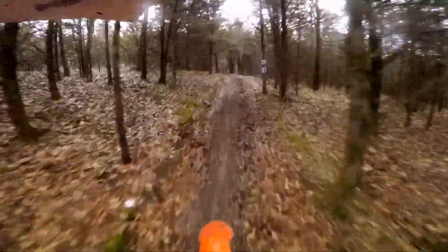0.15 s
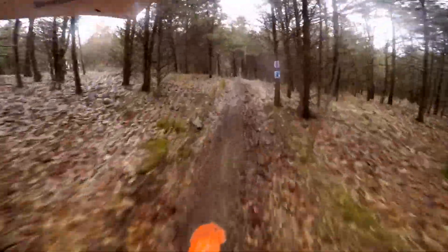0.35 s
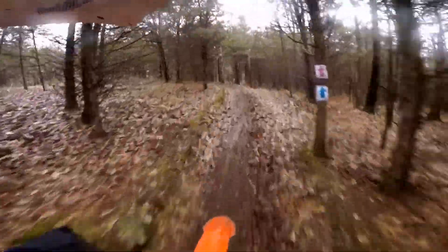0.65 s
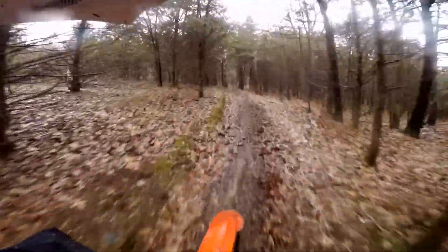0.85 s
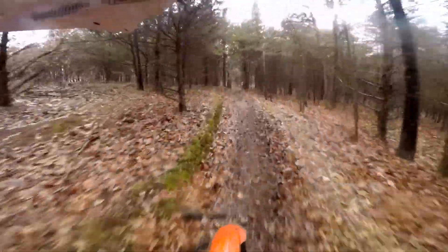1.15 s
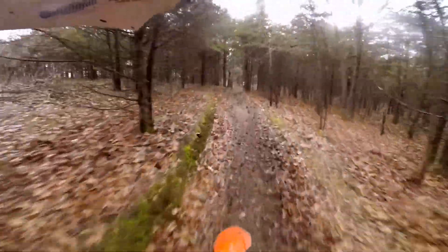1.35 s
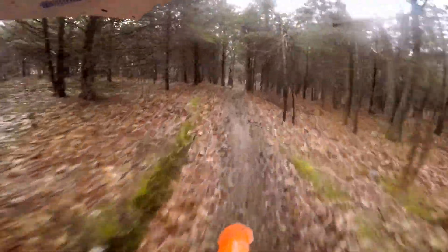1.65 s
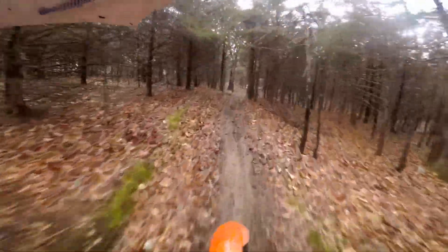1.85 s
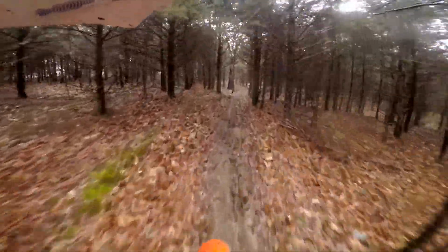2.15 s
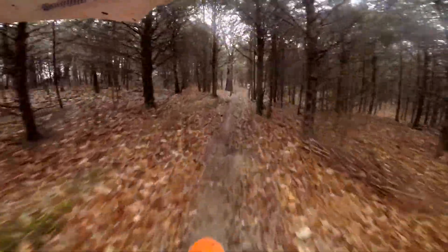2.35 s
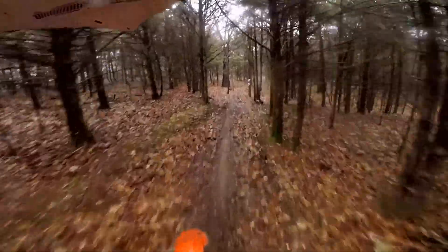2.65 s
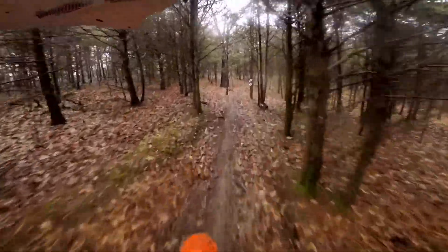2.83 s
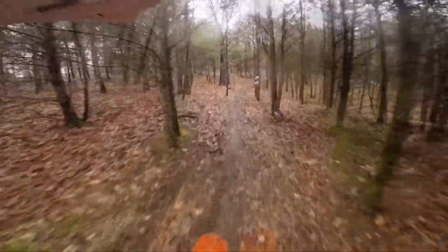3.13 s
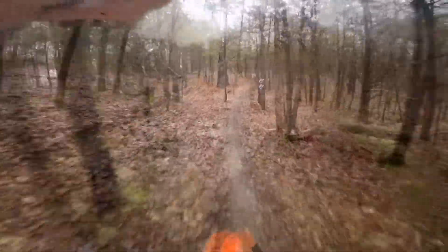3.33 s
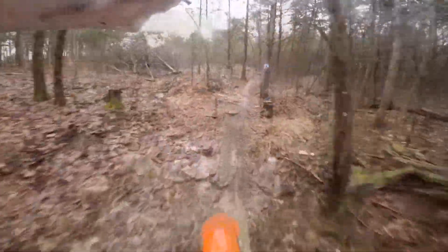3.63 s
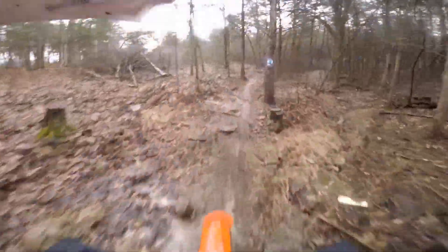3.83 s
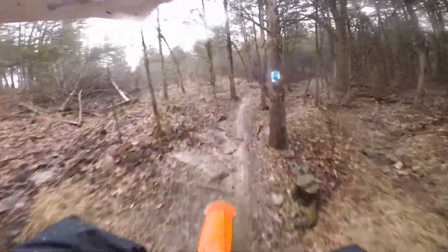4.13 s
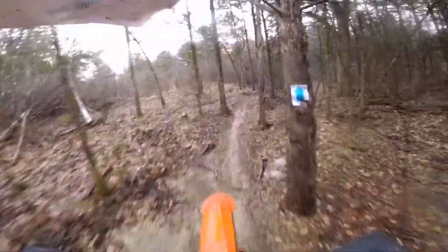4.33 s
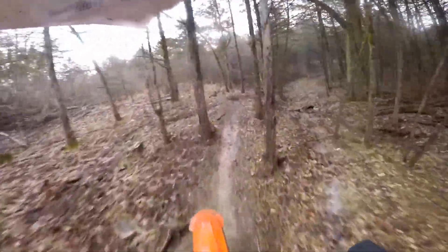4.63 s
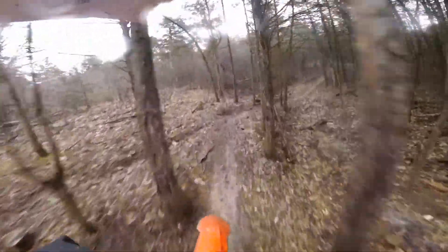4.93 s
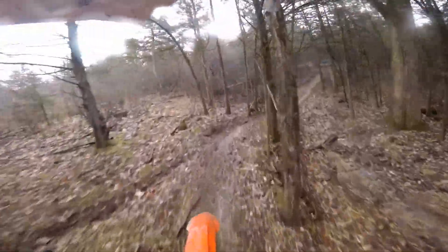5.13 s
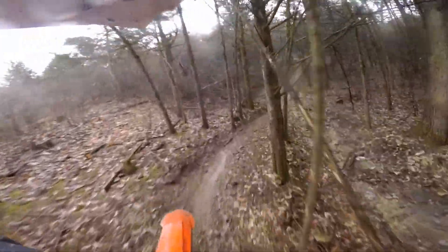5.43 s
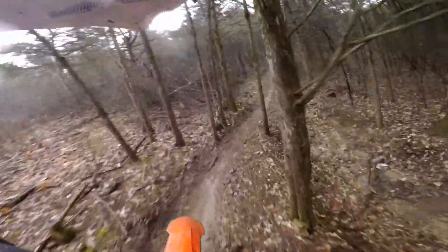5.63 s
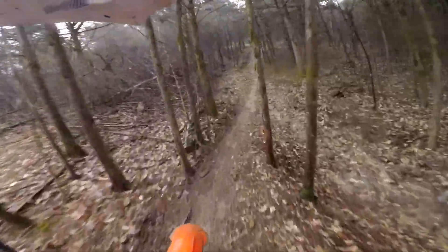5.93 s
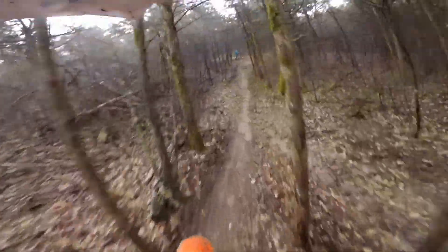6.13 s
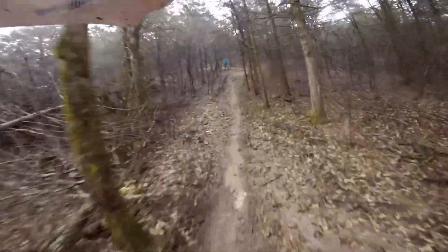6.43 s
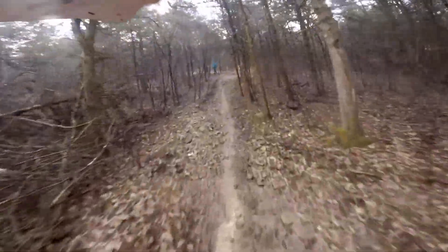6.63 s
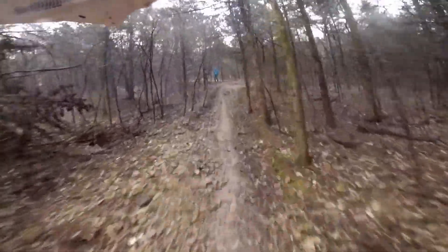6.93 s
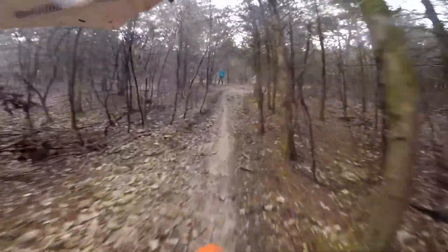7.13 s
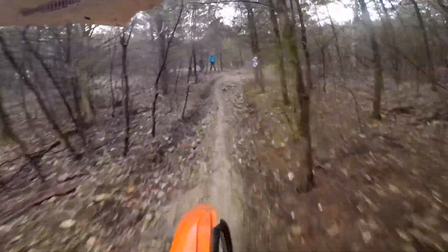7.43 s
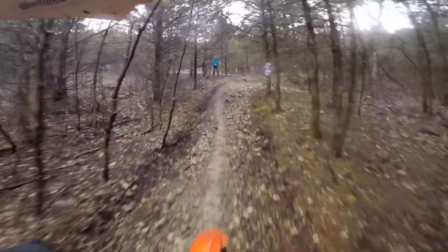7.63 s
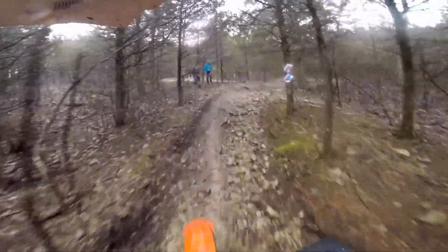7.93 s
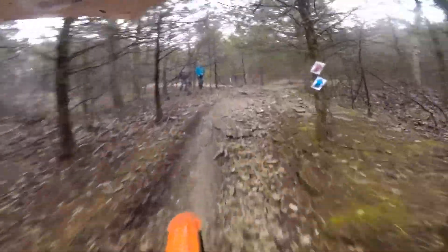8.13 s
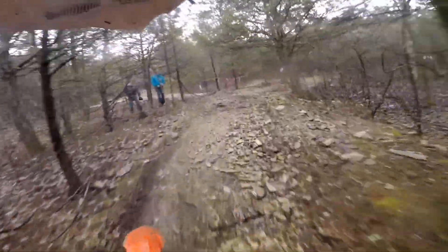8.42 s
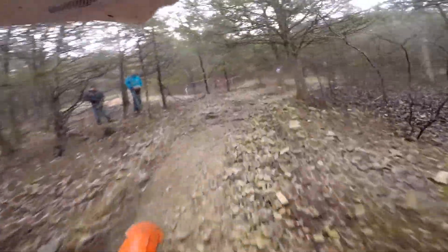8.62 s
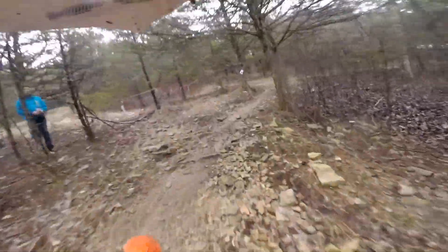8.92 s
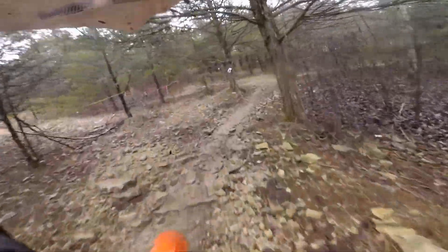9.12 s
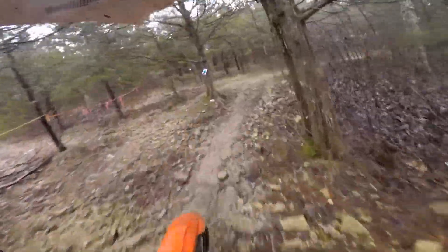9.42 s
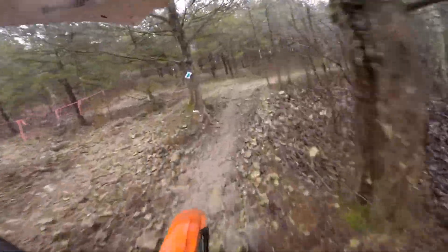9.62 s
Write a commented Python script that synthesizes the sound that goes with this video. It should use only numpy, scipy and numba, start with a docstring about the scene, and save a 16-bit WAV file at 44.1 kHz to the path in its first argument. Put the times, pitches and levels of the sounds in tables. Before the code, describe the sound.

A four-stroke single-cylinder dirt bike is ridden hard through woods, heard close and muffled from a closed housing on the helmet. It begins in full bark, shuts off near 0.6 s, then pulls again from 1.0 to 1.7 s, swelling in level. Short bursts follow around 2.0, 2.6, 3.1 and 3.9 s, each dropping to a ragged burble with occasional pops; a small click falls at 3.9 s. Revs sag in brief blips at 4.5 and 4.8 s, and between 5.2 and 5.8 s jolts thud and rattle over the coasting engine. A long pull from 5.9 to 6.9 s climbs to a high, urgent note. More bursts come at 7.3 and 8.2 s, then lower, lumpy stabs after 8.8 s with knocks from the ground. A bright scrape swishes by at 9.5 s. Chain clatter, wavering gear whine, hiss and gusty low wind continue throughout.

```python
"""On a forest trail, a four-stroke single-cylinder dirt bike is ridden hard, heard from inside a closed
housing on the rider's helmet. Puffs of exhaust ring the pipe whenever the throttle opens; an uneven burble
of noise is left when it shuts. Gears whine as a narrow band of noise, chain and stones clatter as dense
grains ringing the frame, bumps are short noise bursts, and filtered noise makes the wind and a passing scrape."""
import sys
import numpy as np
from scipy import signal
from scipy.io import wavfile
from scipy.ndimage import uniform_filter1d, minimum_filter1d
from numba import njit

SR = 44100
rng = np.random.default_rng(int(sys.argv[2]) if len(sys.argv) > 2 else 0)


def master(y):
    """Save y as 16-bit WAV."""
    cut = np.clip(np.atleast_2d(y).T, -1, 1)
    pcm = np.round(cut * 32767)  # scale
    wavfile.write(sys.argv[1], SR, pcm.astype(np.int16))


N = 430857  # length in samples


def undb(db):
    """Turn decibels into a plain multiplier."""
    return np.exp(np.asarray(db) * (np.log(10) / 20))


def level(x, db):
    """Scale a sound so that its average (RMS) level is db."""
    return x * undb(db) / np.sqrt(np.mean(x ** 2))


def curves(table):
    """Join each column of a table by straight lines over time, one value per sample."""
    times, *columns = np.transpose(table)
    return [np.interp(np.arange(N) / SR, times, column) for column in columns]


def walk(rate):
    """Wander between random normal values, rate of them a second, along straight lines."""
    count = int(N / SR * rate) + 2
    return np.interp(np.arange(N) * (rate / SR), np.arange(count), rng.standard_normal(count))


def ring(x, modes, order=1):
    """Add up resonances (f/Hz, width/Hz, level/dB); order 2 falls off more steeply on both sides."""
    out = 0
    for hz, width, db in modes:
        edges = [hz - width / 2, hz + width / 2]
        band = signal.butter(order, edges, "bandpass", fs=SR, output="sos")
        out = out + undb(db) * signal.sosfilt(band, x)
    return out


@njit
def svf(x, hz, width):
    """Resonance whose centre and width may move, gain 1 at the centre; for tones far below the sample rate."""
    y, band, low = np.empty(len(x)), 0., 0.
    for i in range(len(x)):
        g, k = np.pi * hz[i] / SR, width[i] / hz[i]
        v = (band + g * (x[i] - low)) / (1 + g * (g + k))
        band, low, y[i] = 2 * v - band, low + 2 * g * v, k * v
    return y


def swell(x, hz, width, count):
    """A resonance run forwards and backwards, so it swells into each puff and dies away as evenly after it."""
    for _ in range(2 * count):
        x, hz, width = svf(x, hz, width)[::-1].copy(), hz[::-1].copy(), width[::-1].copy()
    return x


def steady(value):
    """The same value for every sample."""
    return np.full(N, 1. * value)


# level of the three upper pipe modes against the boom, as load and revs change:
# t/s, level/dB, level/dB, level/dB
BARK_LEVELS = [(0.0, -18, -6, -19), (0.08, -8, -14, -19), (0.26, -5.0, -14.5, -24), (0.4, -4.5, -11, -23),
               (0.56, -13.5, -7.5, -17.5), (1.0, -6, -9, -9), (1.2, -20, -16.5, -25),
               (1.36, -21, -17, -25.5), (1.46, -21, -19, -32), (1.6, -19, -29, -29.5),
               (1.78, -24, -21, -17.5), (1.96, -9, -13, -12), (2.04, -19, -11.5, -26),
               (2.16, -25, -16, -27), (2.32, -17, -18, -32), (2.6, -9.5, -9.5, -12.5),
               (2.74, -17, -21, -15.5), (2.82, -9, -12, -24), (2.9, -12, -13.5, -16),
               (2.98, -13, -5.5, -13.0), (3.16, -20, -12, -13.5), (3.28, -13, -16, -29),
               (3.42, -21, -18, -21.5), (3.56, -19, -18, -14.5), (3.94, -10, -8, -15.5),
               (4.08, -15.0, -12, -21.5), (4.22, -16, -15.5, -21.5), (4.52, -11.5, -8, -19),
               (4.7, -14, -2.5, -13), (4.86, -15, -12.5, -21), (4.98, -11, -13.5, -11),
               (5.66, -9, -6.5, -14), (5.76, -8, -4.5, -15), (5.86, -8.0, 2, -4), (6.0, -23, -19.5, -19),
               (6.14, -14, -23, -10.5), (6.28, -15, -16.5, -24), (6.6, -15.5, -17.5, -28),
               (6.78, -5.0, -12, -22), (6.9, -12, -8, -24), (7.04, -1.5, -4, -11.0), (7.3, -9, -17, -11.5),
               (7.45, -9.5, -9.5, -20), (7.58, -7, -3, -15), (7.7, -15.5, -18, -21), (7.8, -7, -7, -17),
               (7.9, -17, -6, -19), (8.22, -4, -9, -14), (8.3, -9, -9.5, -13.0), (8.44, -22, -9.5, -14.5),
               (8.88, -15, -10.5, -14), (9.05, -7, -19, -10.5), (9.2, -10.5, -10.5, -11),
               (9.38, -9.0, -5.5, -16), (9.46, -7, -11, -14), (9.6, -16, -3, -9.5), (9.76, -3, -1, -14)]
# upper pipe modes: f/Hz, width of each filter pass/Hz
PIPE_MODES = [(345, 82), (462, 114), (635, 197)]
# intake drone under the boom: f/Hz, width of each filter pass/Hz, level/dB against the boom
AIRBOX_DRONE = (187, 70, -13.5)
# hum of the crank, two turns a firing: t/s, level/dB
CRANK_HUM = [(0, -29), (5.4, -44.5), (5.6, -27.5), (5.9, -21.5), (6.05, -44.5), (9.77, -39.5)]
BOOM_HZ, BOOM_WIDTH_HZ = 241.6, 148  # lowest pipe mode at 55 firings a second, width of each filter pass
BURBLE_WIDENS = 0.34  # with the throttle shut the boom's ring is this fraction wider again
OUTLET_S = .0008  # delay from the end of a cycle to its puff
CLEAN_DB, RAGGED_DB = -5, -12  # throttle levels of the steadiest and the most ragged firing
SMOOTH_HZ, LUMPY_HZ = 66, 50  # firing rates of the steadiest and the most ragged firing
MODE_DRIFT, MODE_SWELL_DB = .03, 1.2  # wandering of the pipe modes: fraction of pitch, level
RETURN_S, RETURN_DB = 0.00449, -16.5  # the crack comes back once from the far end of the pipe
SILENCER_HZ = 800


def exhaust(phase, hz, throttle_db, wide_db, shut):
    """One puff a cycle rings the pipe, steadier at full pull or high revs; the crank hums beneath."""
    at = np.flatnonzero(np.diff(phase) < 0)
    late, uneven, sharpness = rng.standard_normal((2000, 3))[:len(at)].T
    ragged = np.clip((throttle_db - CLEAN_DB) / (RAGGED_DB - CLEAN_DB), .15, 1)
    ragged = ragged * np.clip((hz - SMOOTH_HZ) / (LUMPY_HZ - SMOOTH_HZ), .4, 1)
    late_s, uneven_db, sharp_db, turbulence = .0004, 2.4, 1.6, .12
    delay = ((OUTLET_S + late_s * ragged[at] * late) * SR).astype(int)
    where = np.clip(at + delay, 0, N - 1)
    puffs, sharp = np.zeros((2, N))
    puffs[where] = undb(uneven_db * ragged[at] * uneven) / np.sqrt(hz[at])
    sharp[where] = puffs[where] * undb(sharp_db * sharpness)

    # with the throttle shut the cylinder misfires and only an uneven burble is left
    burble = 0.79 * shut * undb(3.9 * walk(35))
    gas = rng.standard_normal(N) * (turbulence * (.5 + ragged) + burble)
    drive = level(puffs, 0) * (1 - shut) + gas

    # hotter, faster gas at high revs lifts the lowest mode
    centre = BOOM_HZ * (hz / 55) ** 0.13 * (1 + MODE_DRIFT * ragged * walk(7.3))
    # some pulls ring shorter and wider than others
    width = BOOM_WIDTH_HZ * (hz / 55) ** 0.25 * undb(wide_db) * (1 + BURBLE_WIDENS * shut)
    boom = level(swell(drive, centre, width, count=2), 0)

    # the outrushing gas roughens the upper modes, more so at high revs
    rasp = .33 * (hz / 50) ** 2 * rng.standard_normal(N) * np.exp(-phase / .8)
    sharp = sharp + undb(RETURN_DB) * np.roll(sharp, int(RETURN_S * SR))
    crack = level(sharp, 0) * (1 - shut) + gas + rasp

    # each upper mode drifts and swells alone
    upper = 0
    for (mode_hz, mode_width), db in zip(PIPE_MODES, curves(BARK_LEVELS)):
        mode_level = undb(db + MODE_SWELL_DB * walk(7))
        mode_centre = mode_hz * (1 + MODE_DRIFT * walk(6.2))
        upper = upper + mode_level * level(swell(crack, mode_centre, steady(mode_width), count=1), 0)
    # all modes peak together in one spike, rounded by the silencer
    silencer = signal.butter(2, [290, SILENCER_HZ], "bandpass", fs=SR, output="sos")
    bark = signal.sosfiltfilt(silencer, upper)

    drone_hz, drone_width, drone_db = AIRBOX_DRONE
    drone = swell(drive + rasp, steady(drone_hz), steady(drone_width), count=1)
    airbox = level(drone, drone_db)
    crank = undb(curves(CRANK_HUM)[0]) * np.sqrt(2) * np.sin(4 * np.pi * phase)
    return undb(throttle_db) * (boom + airbox + bark) + crank


# lone firings while the throttle is shut: t/s, level of the kick/dB
STRAY_FIRINGS = [(0.718, -14), (3.684, -8), (4.328, -17), (5.183, -16), (5.308, -16), (5.427, -20),
                 (5.569, -14), (5.589, -15), (8.599, -21), (8.683, -11.5), (8.783, -18)]
# how the idle pipe rings: f/Hz, width/Hz, level/dB
IDLE_PIPE_MODES = [(252, 170, 4.5), (502, 160, -3.5)]


def pops():
    """A stray charge fires in the idle pipe and rings it briefly."""
    kicks = np.zeros(N)
    times, db = np.transpose(STRAY_FIRINGS)
    kicks[(times * SR).astype(int)] = undb(db)
    rung = ring(kicks, IDLE_PIPE_MODES, order=2)
    return rung * kicks.max() / abs(rung).max()


ECHO_DB, ECHO_FADE_S = -8, 0.013


def echoes(x):
    """Ground and trunks throw the exhaust back: dense short reflections fill the gaps between firings."""
    t = np.arange(int(.09 * SR)) / SR
    tail = rng.standard_normal(len(t)) * np.minimum(t / 0.0072, 1) * np.exp(-t / ECHO_FADE_S)
    return x + undb(ECHO_DB) * signal.fftconvolve(x, tail / np.linalg.norm(tail))[:N]


# each twist of the throttle: opens t/s, closes t/s, exhaust level after opening/dB, level at closing/dB,
# fade/s, level of the burble that follows/dB, widening of the boom's ring/dB
THROTTLE_TWISTS = [(-.05, 0.574, -13, -4.5, 0.035, -22.5, -2), (0.994, 1.656, -17, -2, 0.21, -20, -0.5),
                   (1.959, 2.35, -8.5, -4.5, 0.062, -22, -4.2), (2.597, 2.926, -11, -15, 0.043, -26.5, 0.5),
                   (3.098, 3.574, -10.5, -10, 0.04, -22, 1.1), (3.848, 4.234, -13, -8.5, .09, -32, -1.5),
                   (4.46, 4.71, -10.5, -16.5, 0.065, -22.5, -0.5),
                   (4.807, 5.021, -13, -8, 0.1, -35.5, -3.9), (5.64, 5.895, -9.5, -10.5, 0.024, -12, -1.5),
                   (5.927, 6.944, -9, -5, 0.068, -21, -3), (7.261, 7.943, -13, -9, 0.062, -30, -0.9),
                   (8.178, 8.447, -11.5, -12, 0.052, -34.5, -2.7),
                   (8.823, 9.154, -18.5, -7, 0.047, -19, -2.5),
                   (9.245, 9.318, -15.5, -14, 0.1, -22.5, -1.8),
                   (9.448, 9.793, -11.5, -12.5, .05, -20, -0.2)]
OPENING_S = 0.028


def throttle(surge_db):
    """Exhaust level (open, hold, fade, burble) plus its brief changes, and the widening of the boom's ring."""
    opens, closes, first_db, last_db, fade_s, coast_db, wide_db = np.transpose(THROTTLE_TWISTS)
    times = np.ravel([opens, opens + OPENING_S, closes, closes + fade_s], order="F")
    times = np.maximum.accumulate(times)  # never step back in time
    db = np.ravel([np.roll(coast_db, 1), first_db, last_db, coast_db], order="F")
    throttle_db, wide_db = curves(np.transpose([times, db, np.repeat(wide_db, 4)]))
    return throttle_db + surge_db, wide_db


# brief rises of the firing rate with a rise or dip of the exhaust level, some almost only a change of level:
# peak t/s, rise in firing rate f/Hz, time to come and to go/s, change of exhaust level/dB
BRIEF_SURGES = [(.01, 19, .11, -2), (0.239, 9, .09, -2), (0.399, 13, .065, -5.5), (0.563, 12, .12, -6.5),
                (1.302, 6.09, 0.0792, 7.5), (1.42, 2.5, .05, 4), (1.512, 4, 0.041, 4),
                (1.67, 7.5, .12, -5.5), (2.145, 4.11, .05, 3), (2.269, 1.02, 0.068, 2),
                (1.12, 1.02, 0.083, 1), (2.765, 12, .11, -1.5), (2.981, 8, .12, 2.5),
                (3.177, 4.01, 0.0613, -1.5), (3.33, 2, .08, 3), (4.14, 13, .09, 4), (5.974, 9.5, .13, 3),
                (6.241, 4.5, .07, 3), (6.395, 6.2, .07, 2.5), (6.534, 10.34, .07, -0.5),
                (6.667, 6, 0.06, -4.5), (6.856, 10.97, 0.0804, -6.5), (6.98, 5.5, .06, -4),
                (7.369, 7.8, .11, 1), (7.65, 26, .13, 0), (7.739, 9, .09, 2.5), (8.349, 14, 0.06, 5.5),
                (8.93, .5, 0.074, -4), (9.018, .5, 0.052, 2), (9.145, 12, .075, -4),
                (9.526, 1, 0.029, -7.5), (9.625, 9.8, 0.055, 1.5), (9.679, 0.9, 0.033, -7.5)]


def surges():
    """Extra firing rate (Hz) and change of exhaust level (dB): each comes and goes smoothly."""
    t = np.arange(N) / SR
    out = np.zeros((2, N))
    for peak_s, hz, slope_s, db in BRIEF_SURGES:
        i, j = max(int((peak_s - slope_s) * SR), 0), int((peak_s + slope_s) * SR)
        shape = np.cos(np.pi / 2 * (t[i:j] - peak_s) / slope_s) ** 2
        out[:, i:j] += np.outer([hz, db], shape)
    return out


# firing rate without the brief surges: t/s, f/Hz
BASE_REVS = [(0, 63.9), (.314, 67.21), (.454, 71.5), (.678, 66.04), (.893, 54.47), (1.22, 52.89),
             (1.56, 56.94), (1.8, 57.94), (1.995, 53.97), (2.27, 70.33), (2.624, 54.63), (3.1, 54.86),
             (3.24, 56.97), (3.43, 56.87), (3.56, 60.21), (3.62, 58.98), (3.87, 55.9), (3.991, 45.9),
             (4.27, 51.6), (4.48, 40), (4.56, 52.9), (4.67, 47.4), (4.774, 43.1), (5.044, 48.2),
             (5.308, 59.9), (5.6, 49.4), (5.67, 43.4), (5.74, 52.2), (5.817, 49.25), (6.08, 50.63),
             (6.465, 60.46), (6.745, 75), (6.92, 69.92), (7.069, 75.5), (7.283, 52.78), (7.498, 48.96),
             (7.847, 55.17), (7.94, 63.6), (8.05, 63), (8.22, 55.07), (8.29, 48.46), (8.41, 53.5),
             (8.5, 60), (8.86, 43.9), (9.07, 45.1), (9.3, 44.1), (9.45, 39.8), (9.51, 49.4), (9.57, 45.56),
             (9.69, 41.15), (9.77, 44.6)]


def revs(surge_hz):
    """Firings a second: the base rate plus the brief rises."""
    return curves(BASE_REVS)[0] + surge_hz


# moments at which an engine cycle ends, just before its firing sounds: t/s
CYCLE_ENDS = [3.872, 4.026, 4.247, 4.479, 4.527, 4.671, 4.849, 5.006, 5.664, 5.688, 5.831, 5.944, 7.268,
              7.547, 8.214, 8.458, 8.897, 8.991, 9.080, 9.196, 9.310, 9.453, 9.558, 9.731]


def cycles(hz):
    """Engine cycles run so far, nudged so that a whole cycle ends at each listed moment."""
    run = np.cumsum(hz / SR)
    at = (np.array(CYCLE_ENDS) * SR).astype(int)
    steps = np.round(np.diff(run[at], prepend=run[at[0]]))
    whole = np.round(run[at[0]]) + np.cumsum(steps)
    return run + np.interp(np.arange(N), at, whole - run[at])


# t/s, clatter level/dB, level of the hiss of gas and tyres against the clatter/dB
MACHINE_LEVELS = [(0, -32.5, -5.5), (.6, -31.5, -4), (.7, -40, -12), (1.1, -31, -12), (1.3, -32, -6.5),
                  (1.44, -35.5, -16.5), (1.85, -44, -16), (2.2, -40.5, 2), (2.45, -47, -4),
                  (2.75, -31.5, -11), (3.05, -39, -4), (3.25, -32.5, -11), (3.5, -29.5, -7.5),
                  (3.8, -36, -11), (3.9, -34, -4.5), (4.05, -36, -2), (4.27, -35, -6), (4.36, -45, -9),
                  (4.46, -40, -20), (4.6, -37, -7), (5.07, -32, -4.5), (5.15, -37, -8), (5.4, -31, -15),
                  (5.72, -27.5, -8), (6.12, -34.5, -4.5), (6.6, -32, -3.5), (6.75, -28.5, -1.5),
                  (6.9, -29, -0.5), (7.1, -30.5, -6), (7.56, -33, -13), (7.64, -27, -7.5),
                  (7.75, -29.5, -5.5), (8.2, -36, -6.5), (8.46, -32, -5.5), (8.54, -40.5, -13),
                  (8.9, -30, -10.5), (9.44, -29.5, -3.5), (9.52, -28.5, 2.5), (9.61, -26.5, -4.5),
                  (9.77, -32.5, -4)]
# ringing of the frame: f/Hz, width/Hz, level/dB, change of level with the throttle shut/dB
FRAME_MODES = [(1085, 80, -4.5, 9), (1786, 59, 1, -2.5), (2402, 79, -1, 6), (1355, 1450, 2.5, -2.5)]
# bands of the hiss: f/Hz, width/Hz, level/dB
HISS_BANDS = [(3064, 1700, -5), (3903, 250, 0.5), (5320, 1740, 0), (6250, 990, -4.5), (8370, 2150, -3)]
MODE_WAVER_DB, COAST_HISS_DB = 3.2, -2  # waver of a narrow mode; change of hiss with the throttle shut


def machine(phase, shut):
    """Dense metallic grains of chain and stones ring the frame; gas and tyres hiss, throbbing each cycle."""
    clatter_db, hiss_db = curves(MACHINE_LEVELS)
    throb = 1 + .5 * np.exp(-phase / 0.97)
    grains = throb * rng.standard_normal(N) * undb(1.74 * walk(300))
    clatter = 0
    for hz, width, db, shut_db in FRAME_MODES:
        narrow = width < hz  # only narrow modes waver
        waver_db = MODE_WAVER_DB * narrow * walk(9)
        clatter = clatter + undb(waver_db + shut_db * shut) * ring(grains, [(hz, width, db)], order=2)
    hiss = level(undb(2 * walk(10)) * ring(grains, HISS_BANDS, order=2), 0)
    hiss = undb(hiss_db + COAST_HISS_DB * shut) * hiss
    return undb(clatter_db + 1.8 * walk(24)) * (level(clatter, 0) + hiss)


# wavering gear whine: t/s, f/Hz, level/dB
GEAR_WHINE = [(0, 1703, -44), (.09, 1733, -35), (.12, 1696, -41), (.16, 1757, -30.5), (.26, 1850, -35),
              (.33, 1740, -43), (.39, 1800, -32), (.445, 1790, -37), (.55, 1730, -41), (.63, 1774, -30),
              (.66, 1790, -43), (.7, 1604, -43), (.76, 1574, -39), (.8, 1560, -44), (.845, 1550, -40),
              (.88, 1548, -54), (1.5, 1660, -44), (2.1, 1740, -48), (2.15, 1764, -40), (2.28, 1836, -35),
              (2.45, 1588, -47), (2.75, 1754, -41), (2.88, 1674, -47), (3.0, 1760, -35.5), (3.1, 1625, -43),
              (3.29, 1520, -33), (3.6, 1477, -41.5), (3.75, 1567, -45), (5.2, 1377, -48.5),
              (5.36, 1190, -45), (5.5, 1043, -47), (5.62, 1025, -36), (5.68, 1020, -43), (5.9, 1570, -42),
              (7.4, 1590, -46), (7.7, 1652, -36), (8.1, 1580, -42.5), (8.45, 1697, -38.5),
              (8.57, 1720, -47), (9.77, 1657, -49)]


def whine():
    """Meshing gears: noise squeezed into a narrow, fluttering band."""
    hz, db = curves(GEAR_WHINE)
    hz, width = hz * (1 + 0.0092 * walk(18)), steady(90)
    band = svf(svf(rng.standard_normal(N), hz, width), hz, width)
    return level(band, 0) * undb(db + 1.5 * walk(20))


# the bike hits roots and stones: t/s, clank level/dB, thud level/dB (both before filtering and final gain)
JOLTS = [(0.41, -27, -8.5), (3.686, -33, -27), (4.114, -24, -40), (4.387, -39, -49), (4.474, -35, -40),
         (4.516, -27.5, -18), (4.885, -27, -22), (5.184, -28, -33), (5.299, -24, -11.5), (5.4306, -25, -11),
         (5.4904, -27, -31.5), (5.551, -25, -9.5), (5.6508, -22, -5), (5.759, -32, -3.5), (7.637, -45, -6),
         (8.086, -21.5, -14), (8.7158, -31, -33), (8.8886, -19.5, -15), (8.933, -23, -9),
         (9.067, -28, -6.5), (9.189, -26, -4), (9.229, -21, -24), (9.688, -23, -16)]
# loose metal in a jolt: f/Hz, width/Hz, level/dB
RATTLE_MODES = [(1800, 1300, 3), (5000, 3900, -8)]


def bumps():
    """Each jolt: a short burst of rattling metal and a soft thud through the suspension."""
    rattle, thud = 1e-9 * rng.standard_normal((2, N))
    t = np.arange(int(.08 * SR)) / SR
    clank_shape = np.minimum(t / 0.0033, 1) * np.exp(-t / 0.014)
    thud_shape = np.exp(-t / 0.031)
    for hit_s, clank_db, thud_db in JOLTS:
        i = int(hit_s * SR)
        clank_noise, thud_noise = rng.standard_normal((2, len(t)))
        rattle[i:i + len(t)] += (undb(clank_db) * clank_shape * clank_noise)[:N - i]
        thud[i:i + len(t)] += (undb(thud_db) * thud_shape * thud_noise)[:N - i]
    return undb(2.5) * ring(rattle, RATTLE_MODES) + undb(7.0) * ring(thud, [(222, 170, 0.012)])


SCRAPE_S, SCRAPE_LENGTH_S, SCRAPE_DB = 9.525, 0.026, -21  # middle, spread, level at the middle


def scrape():
    """A branch or gravel brushes past: a short bright swish of noise."""
    shape = np.exp(-.5 * ((np.arange(N) / SR - SCRAPE_S) / SCRAPE_LENGTH_S) ** 2)
    swish = ring(rng.standard_normal(N), [(4830, 1800, 0), (1920, 1130, 0)], order=2)
    return shape * level(swish, SCRAPE_DB)


# rumble of the wind: t/s, level/dB
WIND_RUMBLE = [(0.0, -14), (0.02, -28), (1.2, -20), (1.52, -30.5), (3.73, -19), (4.13, -30), (4.68, -26),
               (5.22, -32.5), (5.8, -22), (5.99, -49), (6.04, -29.5), (7.73, -19), (7.75, -29), (8.14, -21),
               (8.73, -28.5), (9.77, -23)]
# air past the helmet: f/Hz, width/Hz, level/dB
AIR_RUSH = [(306, 263, 18), (1500, 970, -10), (4300, 4300, -34)]
RUSH_DB = -31.5  # before its slow wavering


def wind():
    """Wind buffets the housing: noise as a deep rumble in gusts and a gently wavering rush above."""
    gust = rng.standard_normal(N) * undb(2 * walk(15))
    rumble = level(ring(gust, [(68, 135, 0)], order=2), 0) * undb(curves(WIND_RUMBLE)[0])
    rush = level(ring(rng.standard_normal(N), AIR_RUSH), RUSH_DB) * undb(2.63 * walk(7.4))
    return rumble + rush


def scene():
    """Work out revs and throttle, then add up the bike, the bumps and the wind."""
    surge_hz, surge_db = surges()
    hz = revs(surge_hz)
    phase = cycles(hz) % 1
    throttle_db, wide_db = throttle(surge_db)
    shut = 1 / (1 + undb(3 * (throttle_db + 21.5)))  # near 0 with the throttle open, near 1 when shut
    pipe = echoes(exhaust(phase, hz, throttle_db, wide_db, shut) + pops())
    engine = pipe + machine(phase, shut)
    return (engine + whine() + wind() + bumps() + scrape())[None]


HOUSING_HZ, TOP_HZ = 6140, 15700
CLICK_S, CLICK_DB = 3.8713, -9  # start, peak before the limiter
CEILING, LIMITER_S = .96, 0.0053  # highest peak before the top is cut, window of the limiter


def record(dry):
    """The housing muffles the treble, one click is heard, a limiter holds down the loudest peaks, the top is cut."""
    muffled = signal.sosfilt(signal.butter(4, HOUSING_HZ, fs=SR, output="sos"), dry)
    since = np.arange(N) / SR - CLICK_S
    click = -undb(CLICK_DB) * (since >= 0) * np.exp(-np.clip(since, 0, .02) / 0.00044)
    mix = muffled + click
    size = int(LIMITER_S * SR)
    gain = CEILING / np.maximum(abs(mix), CEILING)
    gain = uniform_filter1d(minimum_filter1d(gain, size=size), size=size)
    return signal.sosfilt(signal.ellip(8, .2, 70, TOP_HZ, fs=SR, output="sos"), gain * mix)


dry = scene()
out = record(dry)
master(out)
```